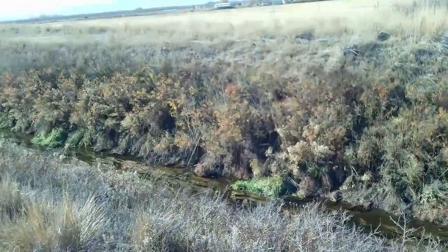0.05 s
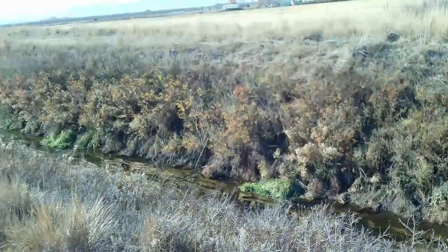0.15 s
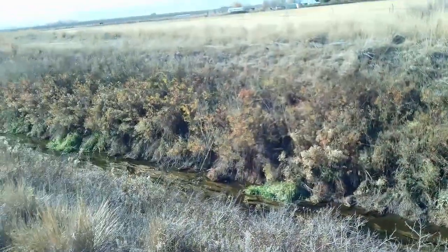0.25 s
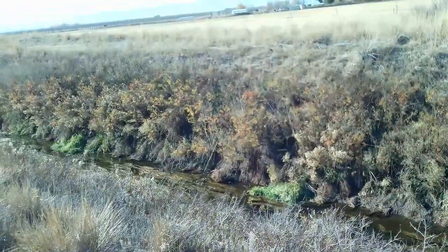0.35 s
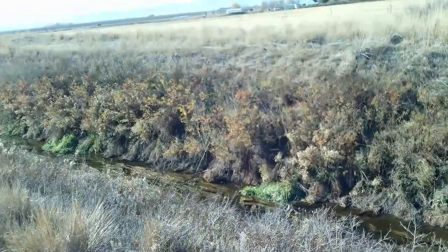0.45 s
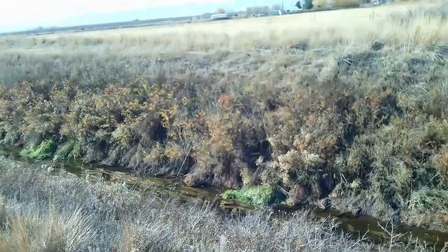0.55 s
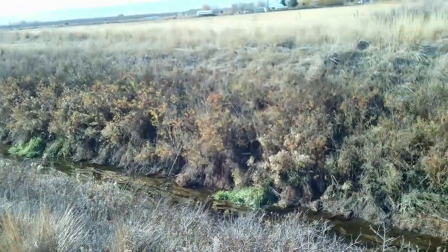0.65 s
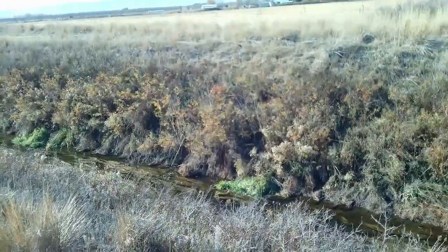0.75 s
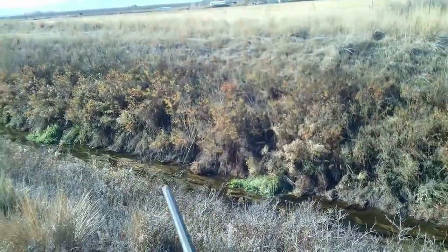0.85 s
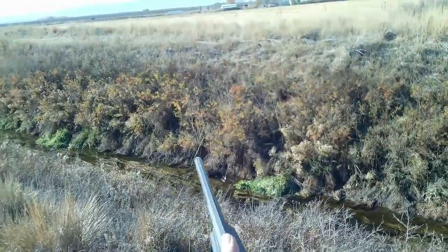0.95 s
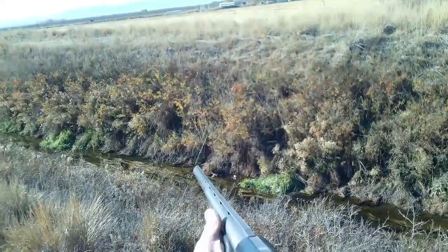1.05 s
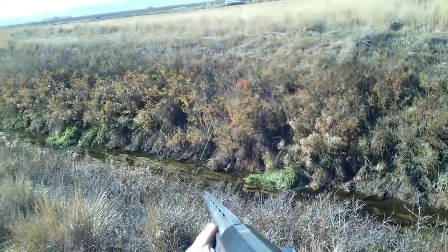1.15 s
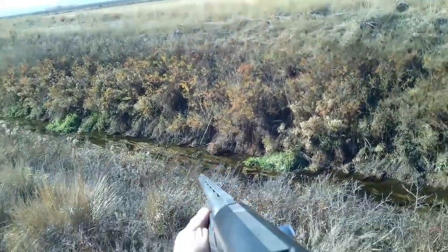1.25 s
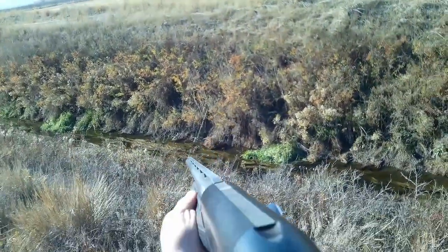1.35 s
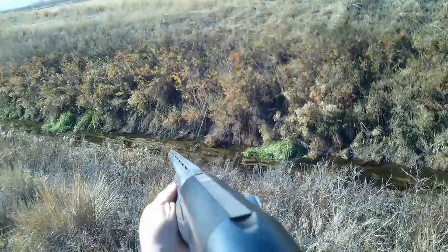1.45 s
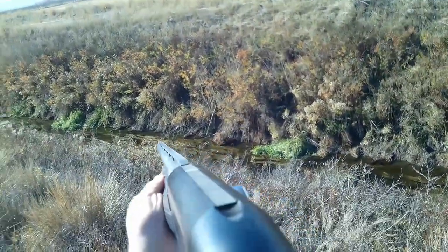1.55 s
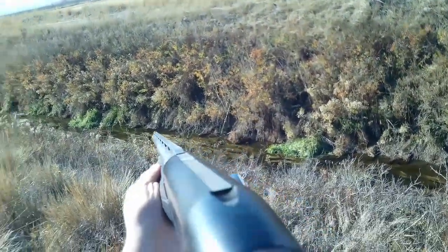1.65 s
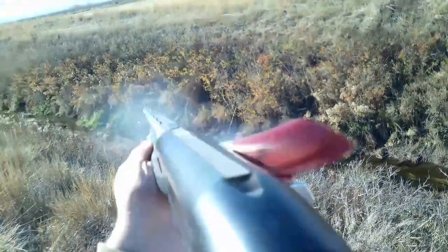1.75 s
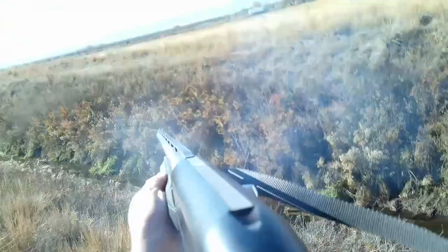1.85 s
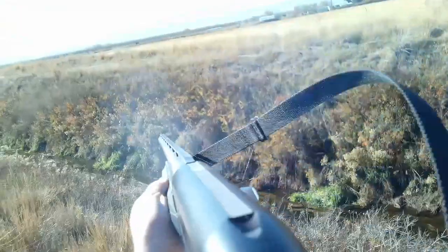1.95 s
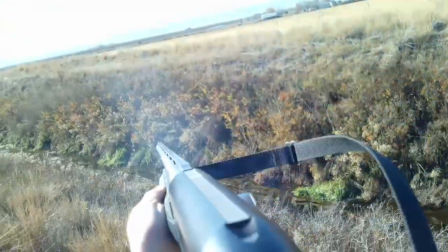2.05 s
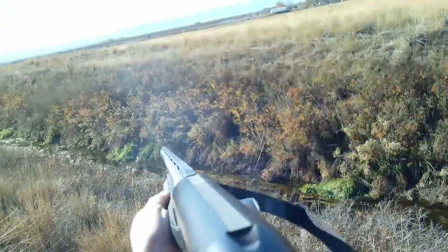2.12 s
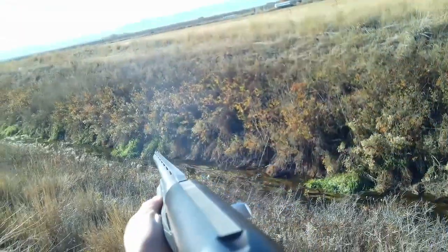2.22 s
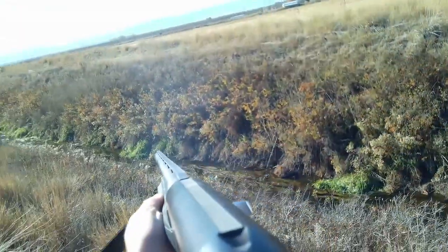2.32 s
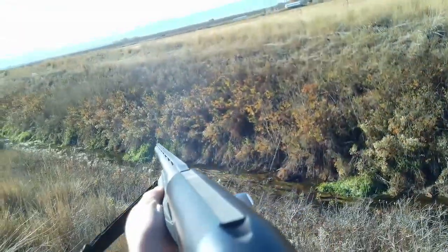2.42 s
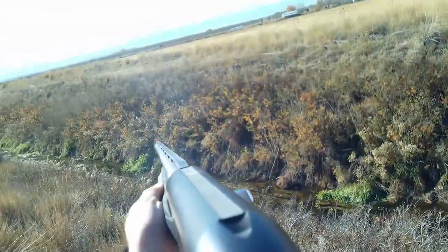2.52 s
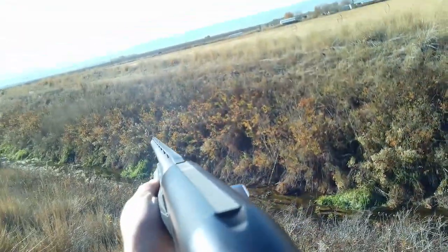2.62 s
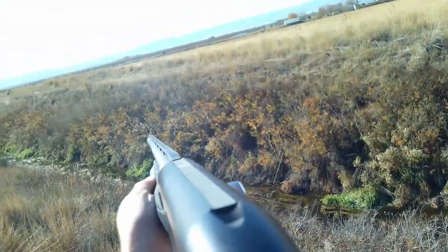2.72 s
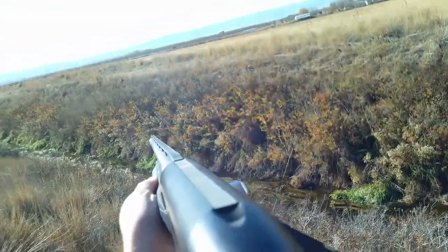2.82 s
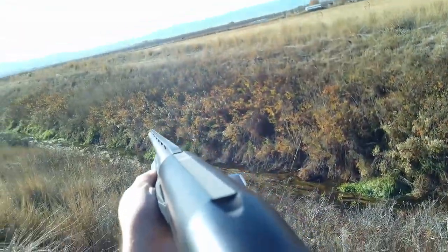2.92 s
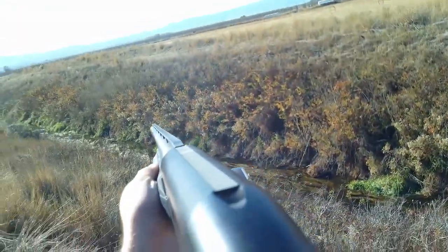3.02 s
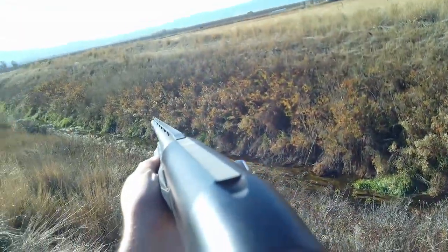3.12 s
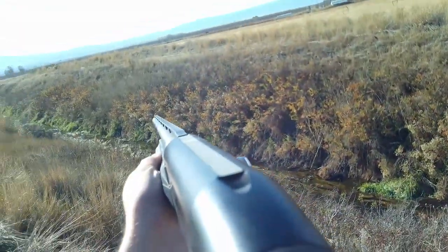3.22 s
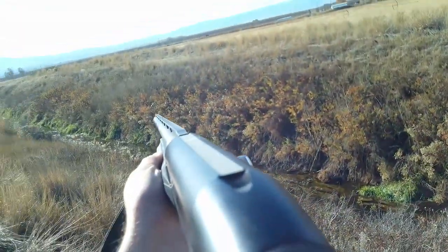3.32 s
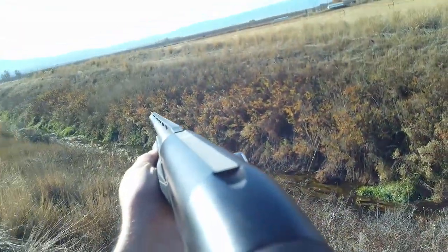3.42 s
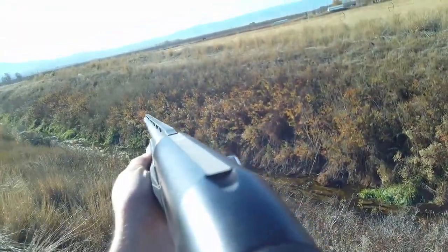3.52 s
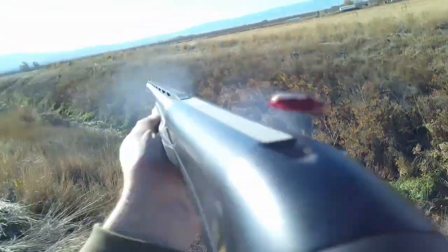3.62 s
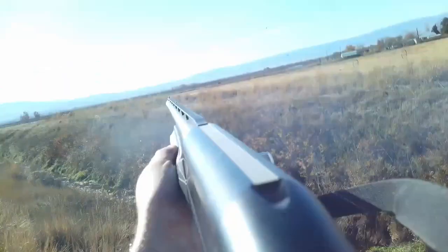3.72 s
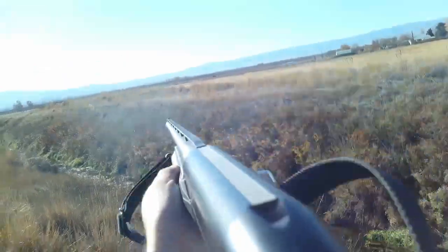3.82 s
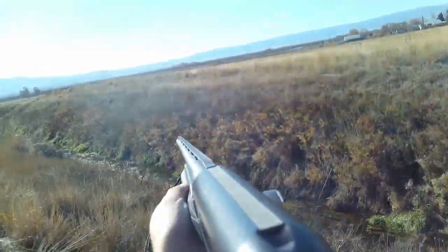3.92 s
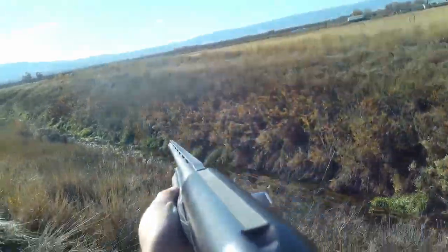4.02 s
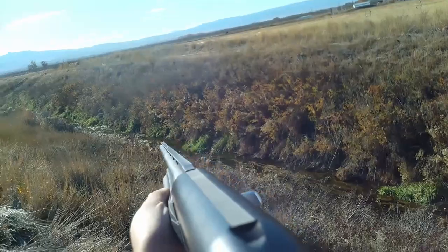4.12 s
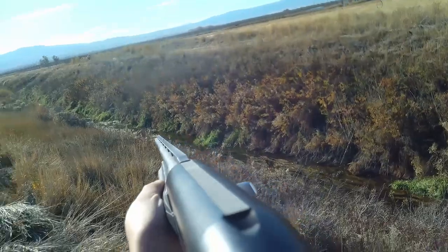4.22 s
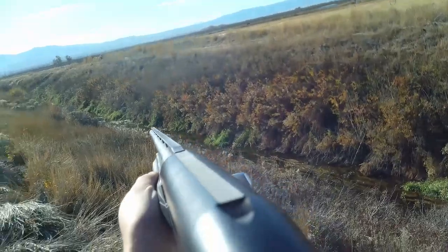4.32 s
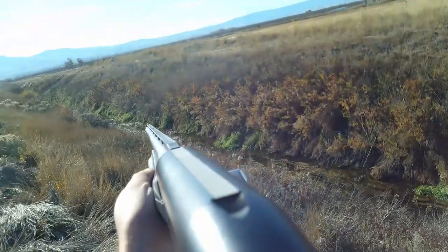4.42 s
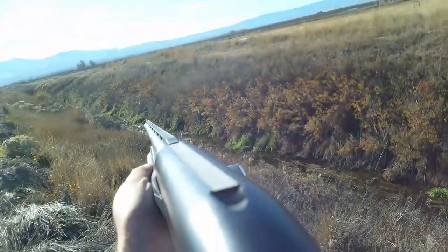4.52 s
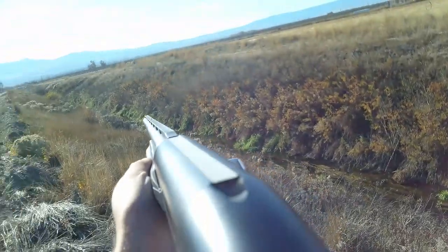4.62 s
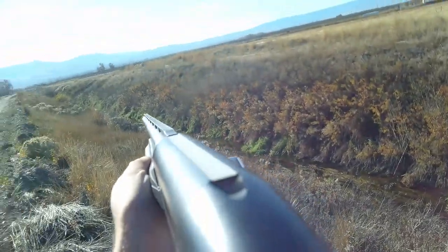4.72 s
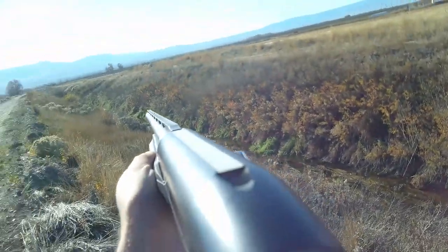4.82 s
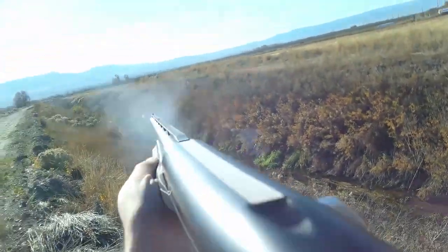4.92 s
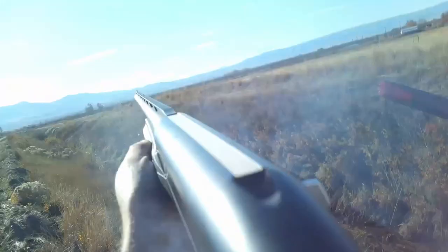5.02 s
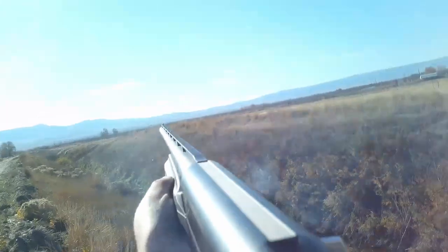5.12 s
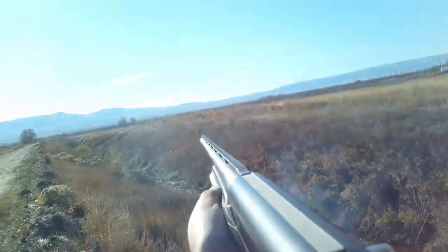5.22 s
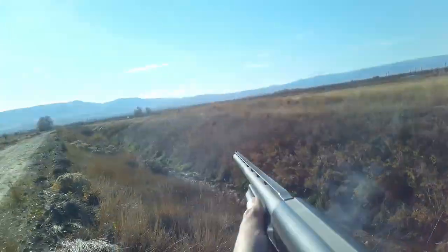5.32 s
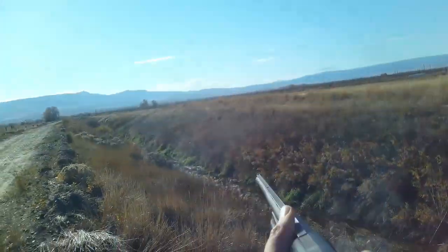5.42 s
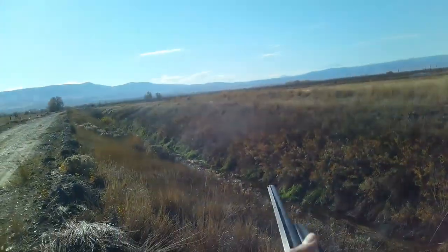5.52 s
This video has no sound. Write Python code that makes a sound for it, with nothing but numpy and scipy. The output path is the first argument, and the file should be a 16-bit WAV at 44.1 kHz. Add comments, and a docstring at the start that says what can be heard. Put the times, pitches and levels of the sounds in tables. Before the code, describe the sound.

Three loud, flattened shotgun blasts crack over an open marsh ditch, each with metallic action clatter and a short rolling echo, between handling knocks and rustles.

```python
"""Three shotgun shots over a marsh ditch

A self-loading shotgun fires three times, the microphone riding on its stock: noise bursts squashed into slams.
The bolt slams back and closes (after the last shell it stays open): rattling noise through the gun's resonances.
The far bank throws each report back as fading noise. Between shots the gun knocks in the hands, and sleeve and
sling rub, as clicks and jerky noise. Behind it are two thin bird whistles, quiet open air and a faint hum."""
import sys
import numpy as np
from scipy import signal
from scipy.fft import rfft, irfft, next_fast_len
from scipy.io import wavfile

SR = 44100
rng = np.random.default_rng(int(sys.argv[2]) if len(sys.argv) > 2 else 0)


def inscribe(sig):
    """Save sig as 16-bit PCM at rate SR to the path in sys.argv[1].

    A 1-D sig is mono; a 2-D sig holds one channel per row.
    Samples are clipped to [-1, 1] before scaling.
    """
    pcm = np.round(np.clip(np.atleast_2d(sig).T, -1, 1) * 32767)
    wavfile.write(sys.argv[1], SR, pcm.astype(np.int16))


N = 245036
T = np.arange(N) / SR   # time of every sample, in seconds

# the shots: (time [s], blast drive into the squashing [dB], scatter from close by [dB], echo delay [s],
# echo level [dB], echo hold [s], time for the echo's basic decay to fall 60 dB [s])
SHOTS = [(1.815, 7.5, -18, .099, -23.5, 0.022, 1.41), (3.67, 8, -19.5, .099, -24, 0.036, 1.21),
         (4.995, 8.5, -19.5, .1015, -26, 0.11, 0.88)]
# resonances of the stock, the metal and the thin parts: (pitch [Hz], width [Hz], level [dB])
GUN_STOCK = [(1070, 150, -2), (1405, 120, 2), (1870, 210, -4)]
GUN_METAL = [(2410, 70, -1), (3600, 450, 2), (3890, 440, -0.5), (5270, 430, -2), (6080, 290, -3.5),
             (6594, 1000, -7.5), (8440, 820, -14.5)]
GUN_THIN_PARTS = [(10050, 1400, -5.5), (11890, 1000, 2.5), (14110, 1700, -6.5)]

TAKE_UP_S = 0.36   # the gun is taken up over this time


def from_db(db):
    """Turn decibels into a plain multiplier."""
    return 10 ** (np.asarray(db) / 20)


def rms_one(x):
    """Scale a sound to an average (rms) level of 1."""
    return x / np.sqrt(np.mean(x ** 2) + 1e-20)


def at_hz(points, hz):
    """Read a curve of (frequency [Hz], value) points, straight between them on a log frequency axis."""
    points = np.array(points)
    return np.interp(np.log(hz), np.log(points[:, 0]), points[:, 1])


def add(track, s, sound):
    """Mix a sound in, starting at s seconds."""
    start = round(s * SR)
    track[start:start + len(sound)] += sound[:N - start]


def low_pass(x, hz, order=2):
    """Dull a sound by weakening what lies above hz."""
    sections = signal.butter(order, min(hz, .45 * SR), fs=SR, output="sos")
    return signal.sosfilt(sections, x + 1e-18)


def dying(t, t60):
    """Zero before t = 0, then an exponential decay from 1 that falls 60 dB in t60 seconds."""
    return (t >= 0) * from_db(-60 * np.maximum(t, 0) / t60)


def coloured(x, spectrum):
    """Filter with a smooth gain curve of (frequency [Hz], gain [dB]) points."""
    hz = np.maximum(np.fft.rfftfreq(len(x), 1 / SR), 1)
    return irfft(rfft(x) * from_db(at_hz(spectrum, hz)), len(x))


def noise(spectrum, size=N):
    """Steady noise of a given colour, rms 1."""
    white = rng.standard_normal(next_fast_len(size))
    return rms_one(coloured(white, spectrum)[:size])


def noise_bands(spectrum, size=N):
    """The same noise split into overlapping octave bands: (centre Hz, band) pairs."""
    padded = next_fast_len(size)
    whole = rfft(noise(spectrum, size=padded))
    log_hz = np.log(np.maximum(np.fft.rfftfreq(padded, 1 / SR), 1))
    centres = 50 * 2. ** np.arange(9)
    bands = []
    for centre in centres:
        share = np.interp(log_hz, np.log(centres), centres == centre)
        bands.append((centre, irfft(whole * share, padded)[:size]))
    return bands


def flutter(hz, size=N):
    """Chance wandering, mostly slower than hz, rms 1."""
    return rms_one(low_pass(rng.standard_normal(size), hz))


def resonate(force, modes):
    """Parallel resonances with alternating signs, driven by a force, rms 1."""
    out = 0
    for k, (hz, width, db) in enumerate(modes):
        r = np.exp(-np.pi * width / SR)   # a wider resonance dies sooner
        poles = [1, -2 * r * np.cos(2 * np.pi * hz / SR), r * r]
        ring = signal.lfilter([1 - r * r, 0, r * r - 1], poles, force + 1e-18)
        out = out + (-1) ** k * from_db(db) * ring
    return rms_one(out)


def blasts(hold_s=0.0037, blast_t60=0.058, gas_delay_s=.004, gas_s=0.0054, gas_db=2, gas_t60=.012,
           dull_hz=8600, lead_in_db=-34, lead_in_s=0.0078, lead_in_t60=0.052):
    """A short faint noise leads in; then muzzle blast and brighter action gas are squashed flat, then low-passed:
    a slam that is dull above dull_hz."""
    # colours of the muzzle blast and of the gas from the action: (frequency [Hz], level per Hz [dB])
    blast_colour = [(30, -8), (70, -8.5), (150, -14.5), (260, 1), (450, -5), (800, 1), (1300, 4),
                    (2000, -8.5), (4000, -18), (8000, -21), (15000, -44)]
    gas_colour = [(200, -15), (1200, -8.5), (3200, 1.5), (5000, -5.5), (8000, -9), (15000, -31)]
    out, t = np.zeros(N), T[:SR // 4]
    size = len(t)
    for s, blast_db, *_ in SHOTS:
        ring = resonate(rng.standard_normal(size), GUN_STOCK + GUN_METAL) * dying(t, lead_in_t60)
        lead_in = ring + noise(blast_colour, size=size) * dying(t, lead_in_t60)
        add(out, s - lead_in_s, from_db(lead_in_db) * low_pass(lead_in, dull_hz, order=10))
        muzzle = noise(blast_colour, size=size) * dying(np.maximum(t - hold_s, 0), blast_t60)
        gas_fade = dying(np.maximum(t - gas_delay_s - gas_s, 0), gas_t60)
        gas = noise(gas_colour, size=size) * (t > gas_delay_s) * gas_fade
        # tanh squashes the peaks flat
        squashed = np.tanh(from_db(blast_db) * (muzzle + from_db(gas_db) * gas))
        add(out, s, 0.85 * low_pass(squashed, dull_hz, order=10))
    return out


def action(stock_db=-3, metal_db=-5, thin_db=-4, crack_db=-7, thud_db=-10, thud_hz=700, edge_share=.6):
    """Steel slams on steel: a dense rattle rings the gun, with a thud and a bright crack that dies first."""
    # bolt and shell strikes: (time [s], level [dB], time for the body to fall 60 dB [s], treble [dB])
    strikes = [(1.8407, -4, 0.04, -2), (1.9445, -5, 0.022, -12), (1.9505, -10, 0.066, -14),
               (1.99, -19.5, 0.033, -14), (1.9926, -14, 0.013, -2), (3.6958, -0.5, 0.029, -5),
               (3.803, -9.5, 0.034, -5.5), (3.8098, -3.5, 0.027, -9), (3.8785, -14.5, 0.022, -2.5),
               (5.0069, -12.5, 0.05, 0.5), (5.02, -3.5, 0.046, -2.5)]
    out, t = np.zeros(N), T[:SR // 8]
    for s, db, t60, treble_db in strikes:
        rattle = rng.standard_normal(len(t))
        body = from_db(stock_db) * resonate(rattle, GUN_STOCK)
        body += from_db(metal_db) * resonate(rattle, GUN_METAL)
        body += from_db(thud_db) * rms_one(low_pass(rng.standard_normal(len(t)), thud_hz))
        edge = from_db(thin_db) * resonate(rattle, GUN_THIN_PARTS)
        edge += from_db(crack_db) * rng.standard_normal(len(t))
        bright = from_db(treble_db) * edge * dying(t, edge_share * t60)
        add(out, s, from_db(db) * (body * dying(t, t60) + bright))
    return out


def marsh(near_t60=0.32, near_delay_s=0.018, flutter_hz=60, bank_hz=1050, bank_octaves=0.52, patch_hz=14):
    """Grass close by scatters the blast; the far bank answers a tenth of a second later and rolls away."""
    # colours of the close scatter and of the echo as it sets out: (frequency [Hz], level per Hz [dB])
    near_colour = [(30, 2.5), (80, 4.5), (200, 0), (400, -1), (700, -6.5), (1100, 1.5), (2000, -4.5),
                   (4000, -7.5), (8000, -11.5), (15000, -16.5)]
    echo_colour = [(30, -22.5), (80, -18), (170, 0), (350, 1.5), (620, -2), (1000, 2.5), (1450, -0.5),
                   (2000, -2.5), (2550, -6), (3550, -5.5), (5100, -11.5), (6100, -14), (12500, -24.5),
                   (15500, -29)]
    # what air and grass take from the echo on its way: (frequency [Hz], loss per second [dB])
    air_loss = [(40, 7), (200, 1.5), (1000, 13), (3000, 9.5), (7000, 28.5), (15000, 37)]
    # the bank's resonance fades from the start level to the end level
    bank_start_db, bank_end_db, bank_fade_s = 6.5, -4.5, 0.027
    # the echo swells quickly, holds and rolls away ever faster
    attack_s, steepening_db_per_s2, tilt_db_per_octave = 0.0017, 31, .5
    lumps_db, patch_db = 1.8, 0.6
    out, t = np.zeros(N), T[:SR]
    size = len(t)
    for s, _, near_db, delay_s, echo_db, hold_s, t60 in SHOTS:
        near = noise(near_colour, size=size) * dying(t, near_t60)
        add(out, s + near_delay_s, from_db(near_db) * near)
        rolling = np.maximum(t - hold_s, 0)
        bank_db = bank_end_db + (bank_start_db - bank_end_db) * np.exp(-rolling / bank_fade_s)
        # uneven reflectors make the echo lumpy, partly alike in all bands
        bushes, echo = flutter(flutter_hz, size=size), 0
        for hz, band in noise_bands(echo_colour, size=size):
            octaves = np.log2(hz / bank_hz)
            resonance_db = bank_db * np.exp(-(octaves / bank_octaves) ** 2)
            colour_db = tilt_db_per_octave * octaves + resonance_db - at_hz(air_loss, hz) * t
            uneven_db = lumps_db * (.5 * bushes + flutter(flutter_hz, size=size))
            uneven_db += patch_db * flutter(patch_hz, size=size)
            echo = echo + band * from_db(colour_db + uneven_db)
        envelope = np.minimum(t / attack_s, 1) * dying(rolling, t60)
        envelope *= from_db(-steepening_db_per_s2 * rolling ** 2)
        add(out, s + delay_s, from_db(echo_db) * envelope * echo)
    return out


def knocks(metal_db=9, thin_db=-14, dull_hz=5200, chatter=0.19, chatter_t60=0.02,
           place_db_per_octave=8, spread_db=2):
    """A click and short chatter ring stock and metal; the place touched favours one pitch of the stock."""
    # knocks of the gun in the hands: (time [s], peak level [dB], metal ring before the metal_db lift [dB],
    # strongest pitch of the stock [Hz])
    main_knocks = [(1.0149, -28.5, -17, 1450), (1.044, -38.5, -25, 1440), (1.065, -33.5, -10.5, 1480),
                   (1.101, -42, -32, 1490), (1.1933, -43.5, -14, 1630), (1.2399, -40, -25, 1570),
                   (1.286, -39.5, -19, 1380), (1.5997, -36.5, -19, 1060), (1.6827, -42.5, -18, 1110),
                   (1.779, -49.5, -35, 1350), (2.1939, -25.5, -11, 1900), (2.4207, -29.5, -35.5, 1365),
                   (2.4307, -23, -15.5, 1650), (2.445, -29.5, -25, 1144), (2.458, -32, -14.5, 1443),
                   (2.6364, -42, -38, 1447), (2.6762, -46.5, -36, 1539), (2.7553, -54, -19, 1450),
                   (3.167, -35.5, -39, 1420), (3.376, -45, -25, 1443), (3.447, -45, -31.5, 1440),
                   (4.0495, -24.5, -15, 1850), (4.107, -32.5, -6, 1790), (4.131, -28, -12, 1522),
                   (4.1453, -26, -20.5, 1295), (4.3266, -41, -26, 1418), (4.378, -30.5, -15.5, 1430),
                   (4.4033, -45, -29, 1100), (4.6119, -45, -24, 1450), (4.7182, -41.5, -21, 1100),
                   (5.3741, -20.5, -17.5, 1800), (5.395, -34.5, -17, 1870), (5.44, -32.5, -17.5, 1060),
                   (5.4937, -32, -23, 1070), (5.5134, -30.5, -18, 1340)]
    # lighter knocks come by chance while the gun is held; their levels spread around light_db
    light_per_s, light_db, light_metal_db = 5.5, -58, -22
    held_s = T[-1] - TAKE_UP_S
    light = []
    for when, size, place in rng.random((64, 3))[:int(light_per_s * held_s)]:
        peak_db = light_db + spread_db * (2 * size - 1)
        light.append((TAKE_UP_S + when * held_s, peak_db, light_metal_db, GUN_STOCK[0][0] * 2 ** place))
    out, t = np.zeros(N), T[:SR // 16]
    for s, peak_db, ring_db, pitch_hz in main_knocks + light:
        force = chatter * rng.standard_normal(len(t)) * dying(t, chatter_t60) + (t == 0)
        stock = [(hz, width, db - place_db_per_octave * abs(np.log2(hz / pitch_hz)))
                 for hz, width, db in GUN_STOCK]
        metal = [(hz, width, db + spread_db * rng.standard_normal()) for hz, width, db in GUN_METAL]
        ring = resonate(force, metal) + from_db(thin_db) * resonate(force, GUN_THIN_PARTS)
        ring = low_pass(ring, dull_hz, order=1)
        knock = resonate(force, stock) + from_db(metal_db + ring_db) * ring
        add(out, s, from_db(peak_db) * knock / np.abs(knock).max())
    return out


def handling(grain_db=2.5, grain_hz=150, sling_grain_db=3.0, sling_grain_hz=400, bump_hz=170):
    """Cloth and webbing slip in small jerks; the stock bumps the shoulder."""
    # colours of the rubbing sleeve, before its brightness tilt, and of the sling:
    # (frequency [Hz], level per Hz [dB])
    cloth_colour = [(40, 4.5), (150, -2), (400, 5), (700, 2.5), (1300, 0), (2700, -11), (3600, -7.5),
                    (4300, -15), (5500, -10), (9000, -14.5), (13000, -10.5), (16000, -17)]
    sling_colour = [(200, -41), (1000, -19), (1900, -3.5), (2500, -7.5), (3500, 4), (4500, -5.5),
                    (6500, -13), (8000, -11), (10500, -25), (13000, -13.5), (16000, -29.5)]
    # soft bumps and recoil shoves of the stock on the shoulder, as low-passed noise bursts:
    # (time [s], peak level [dB], time for the push to fall 60 dB [s])
    bumps = [(1.066, -45, 0.042), (1.247, -36.5, 0.13), (1.822, -7.5, 0.043), (1.912, -24, 0.046),
             (3.378, -50.5, 0.11), (3.692, -20, .12), (3.775, -30.5, 0.14), (4.045, -49, 0.12),
             (4.587, -54, 0.049), (5.055, -24, 0.38), (5.152, -47, 0.32), (5.363, -40, 0.15)]
    # the sling slides along the gun after the second shot: it gathers speed, runs, and is caught
    slide_s, slide_hold_s, slide_db, rise_db_per_s, fall_db_per_s = 3.968, 0.023, -26, 230.5, 648
    sleeve_db, tilt_db = sleeve_motion()
    sleeve = sum(band * from_db(tilt_db * np.log2(hz / 3000)) for hz, band in noise_bands(cloth_colour))
    out = sleeve * from_db(sleeve_db + grain_db * flutter(grain_hz))
    sling_db = slide_db - rise_db_per_s * np.maximum(slide_s - T, 0)
    sling_db -= fall_db_per_s * np.maximum(T - slide_s - slide_hold_s, 0)
    slips = from_db(sling_grain_db * flutter(sling_grain_hz))
    out += from_db(sling_db) * slips * noise(sling_colour)
    t = T[:SR // 4]
    for s, db, t60 in bumps:
        push = low_pass(rng.standard_normal(len(t)) * dying(t, t60), bump_hz)
        add(out, s, from_db(db) * push / np.abs(push).max())
    return out


def sleeve_motion():
    """Level (dB) and brightness (dB per octave) of the rubbing: arm movements on top of a slight resting stir."""
    # arm movements that rub the sleeve, each a smooth swell:
    # (middle [s], length [s], level [dB], brightness [dB per octave])
    moves = [(0.616, 0.085, -69.5, -1), (0.743, .08, -67.5, 1), (0.92, 0.14, -72.5, 12),
             (1.088, 0.2, -61, -1), (1.256, .11, -59.5, 1), (2.62, 0.26, -74.5, -4), (4.456, 0.35, -71, -3),
             (5.55, .35, -60, -1.5)]
    # the sleeve never lies quite still; this stir grows while the gun is taken up
    resting_db, resting_db_per_octave = -76, -0.5
    power = (from_db(resting_db) * np.clip(T / TAKE_UP_S, .1, 1) ** 2) ** 2
    tilt = resting_db_per_octave * power
    for s, length, db, brightness in moves:
        swell = (from_db(db) * np.exp(-2 * ((T - s) / length) ** 2)) ** 2
        power, tilt = power + swell, tilt + brightness * swell
    # the stronger a movement is, the more its brightness counts
    return 10 * np.log10(power), tilt / power


def snags(per_s=350, snag_db=-4, metal_db=-5):
    """Threads catch on the gun, a fine crackle in its resonances; a few longer scratches rasp."""
    # short scratches of cloth on the stock: (time [s], level [dB], time to fall 60 dB [s])
    scratches = [(4.785, -53.5, 0.04), (4.811, -56.5, .06), (4.84, -55.5, 0.1), (4.87, -59, 0.13)]
    # resonances of the scratches: (pitch [Hz], width [Hz], level [dB])
    scratch_modes = [(1150, 170, -0.5), (3490, 180, 2), (5100, 290, -7.5), (9000, 510, -5.5),
                     (11620, 600, -11), (13900, 1000, -7)]
    sleeve_db, _ = sleeve_motion()
    catches = (rng.random(N) < per_s / SR) * rng.standard_normal(N)
    crackle = resonate(catches, GUN_STOCK) + from_db(metal_db) * resonate(catches, GUN_METAL)
    out = from_db(sleeve_db + snag_db) * crackle
    t = T[:SR // 6]
    for s, db, t60 in scratches:
        rasp = rng.standard_normal(len(t)) ** 3   # cubing makes the noise spiky
        add(out, s, from_db(db) * resonate(rasp, scratch_modes) * dying(t, t60))
    return out


def ticks(snap_t60=0.011):
    """Tiny hard contacts: a broad dry snap of noise with no ring."""
    # dry ticks of snapping twigs: (time [s], peak level [dB])
    contacts = [(0.5834, -48), (0.9727, -39), (1.0, -37), (1.4251, -38), (2.7844, -50), (2.9074, -48)]
    # colour of a tick: (frequency [Hz], level per Hz [dB])
    tick_colour = [(300, -8), (1400, 4), (3000, -7), (6000, -1), (9000, -7), (14000, -3)]
    out, t = np.zeros(N), T[:SR // 32]
    for s, peak_db in contacts:
        snap = noise(tick_colour, size=len(t)) * dying(t, snap_t60)
        add(out, s, from_db(peak_db) * snap / np.abs(snap).max())
    return out


def bird(width_hz=330):
    """Thin buzzy whistles that swell and fade: noise through one resonance, twice."""
    # two thin notes of a far bird: (time [s], length [s], pitch [Hz], level before the swell [dB])
    notes = [(0, .14, 4830, -82), (0.184, 0.385, 5330, -82.5)]
    out = np.zeros(N)
    for s, length, hz, db in notes:
        swell = signal.windows.tukey(int(length * SR), .5)
        mode = [(hz, width_hz, 0)]
        whistle = resonate(resonate(rng.standard_normal(len(swell)), mode), mode)
        add(out, s, from_db(db) * swell * whistle)
    return out


def background(waver=.011, waver_hz=4, fade_db=3, fade_hz=4):
    """Quiet open air with a faint hum whose lines waver and fade; a thin hiss differs between the ears."""
    # colour of the open air: (frequency [Hz], level per Hz [dB])
    air_colour = [(15, -33), (25, 1.5), (113, -5), (178, -5), (322, -15), (457, -13.5), (509, -23),
                  (782, -15), (2120, -30.5), (5430, -29.5), (6730, -38), (8810, -28.5), (15500, -37.5)]
    # how much the hiss differs between the ears: (frequency [Hz], level against the middle [dB])
    air_width = [(60, -17.5), (110, -18.5), (200, -15.5), (380, -14.5), (700, -10), (1290, -10.5),
                 (2380, -5), (4400, -4), (8120, -2), (15000, -5)]
    # lines of the faint far hum: (pitch [Hz], level before the overall hum level [dB])
    hum_lines = [(89, -76), (178, -73.5), (247, -78.5), (268, -80), (355, -77.5), (447, -83.5)]
    # the hum comes up at the start
    air_db, hum_start_db, hum_end_db, hum_rise_s = -70, -20, -2, 1.43
    hum_db = np.interp(T, [0, hum_rise_s], [hum_start_db, hum_end_db])
    wavering_s = np.cumsum(1 + waver * flutter(waver_hz)) / SR   # time that runs a little unevenly
    hum = 0
    for hz, db in hum_lines:
        fading = from_db(db + fade_db * flutter(fade_hz))
        hum = hum + fading * np.sqrt(2) * np.sin(2 * np.pi * (hz * wavering_s + rng.random()))
    air = noise(air_colour) + coloured(noise(air_colour), air_width) * np.array([[1], [-1]])
    return from_db(hum_db) * hum + from_db(air_db) * air


def scene(width_delay_s=.0088):
    """All sources but the background hiss are central; a faint delayed copy, opposite in the ears, adds slight
    width."""
    # how strongly the copy sets the ears apart: (frequency [Hz], level against the middle [dB])
    side_width = [(30, -26), (250, -30.5), (600, -39), (4000, -45), (8000, -34), (14000, -37.5)]
    centre = blasts() + action() + marsh() + handling() + snags() + bird() + ticks() + knocks()
    delayed = np.interp(T - width_delay_s, T, centre, left=0)
    side = coloured(delayed, side_width)
    return centre + side * np.array([[1], [-1]]) + background()


def record(dry, cutoff_hz=15300):
    """Peaks are flattened smoothly at full scale, then the top is cut steeply."""
    clipped = dry / (1 + dry ** 8) ** (1 / 8)
    return signal.sosfilt(signal.ellip(10, .1, 70, cutoff_hz, fs=SR, output="sos"), clipped)


dry = scene()
out = record(dry)
inscribe(out)
```